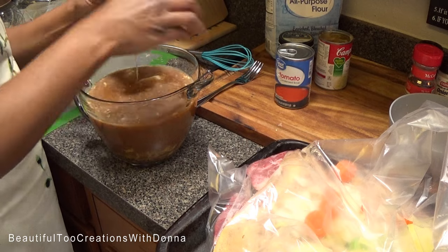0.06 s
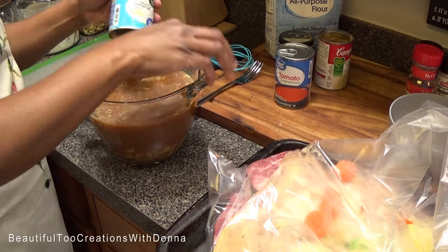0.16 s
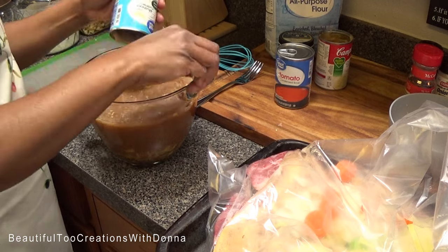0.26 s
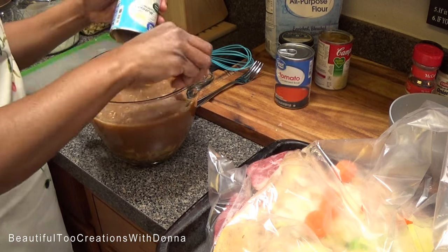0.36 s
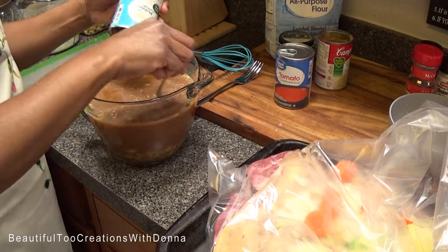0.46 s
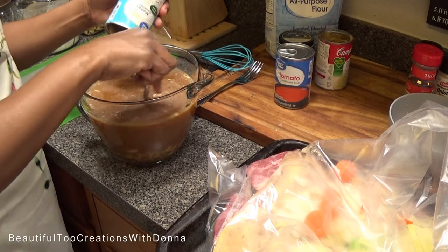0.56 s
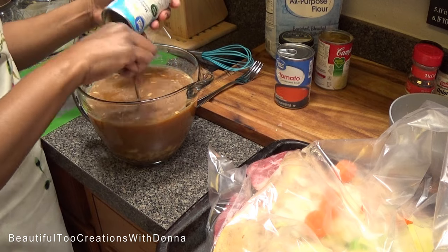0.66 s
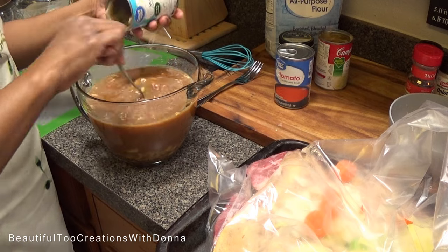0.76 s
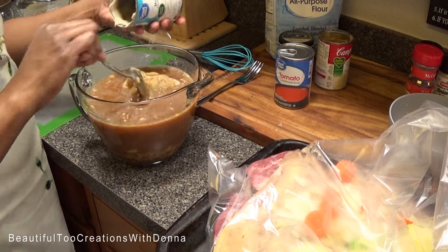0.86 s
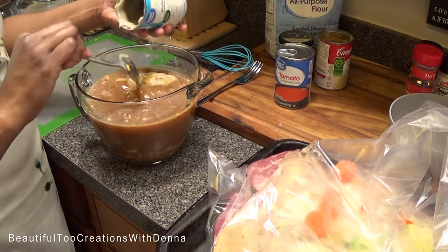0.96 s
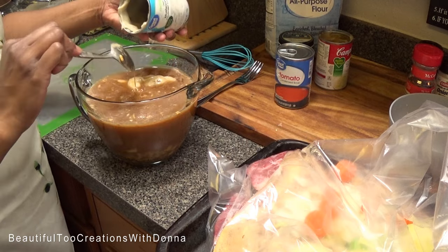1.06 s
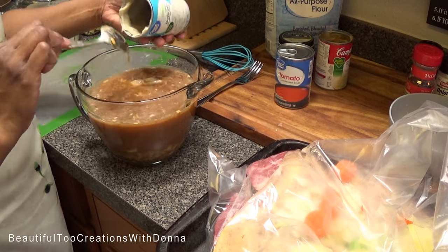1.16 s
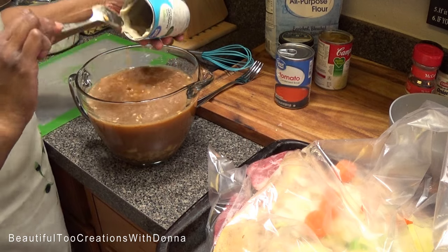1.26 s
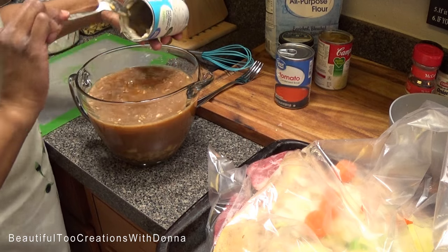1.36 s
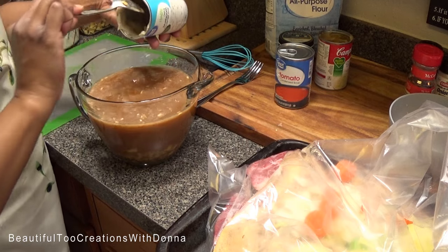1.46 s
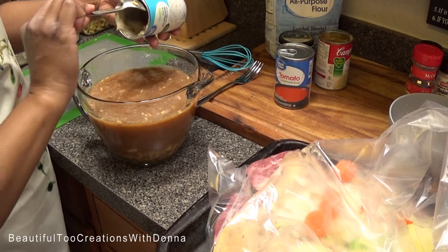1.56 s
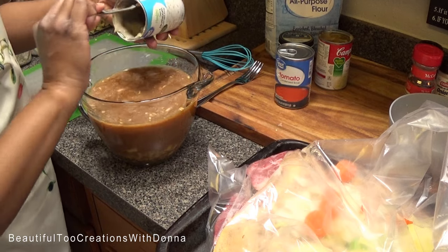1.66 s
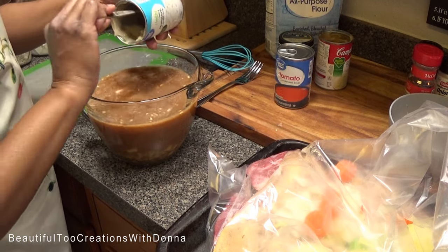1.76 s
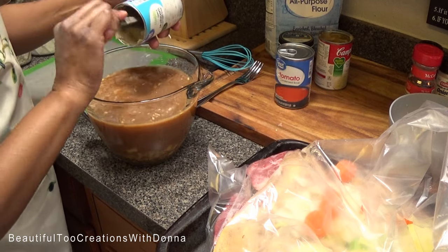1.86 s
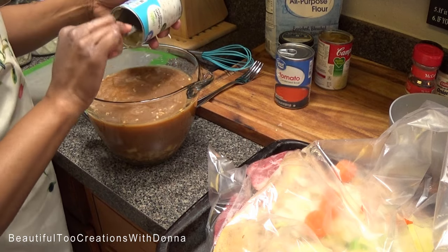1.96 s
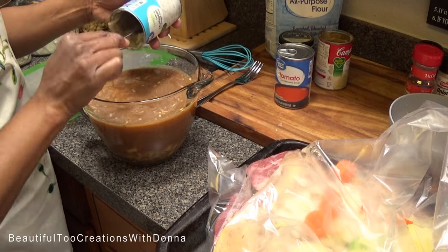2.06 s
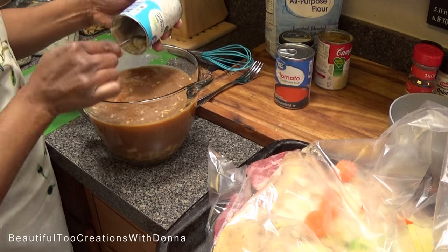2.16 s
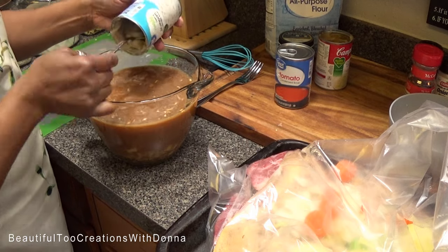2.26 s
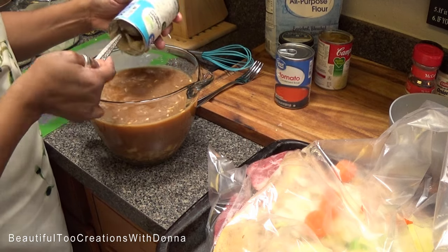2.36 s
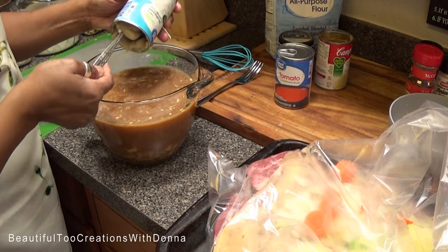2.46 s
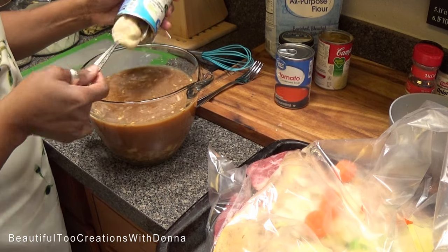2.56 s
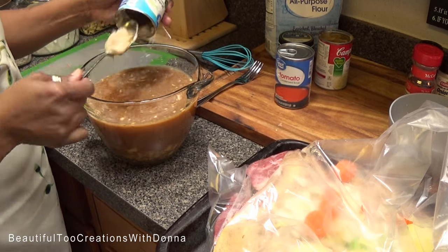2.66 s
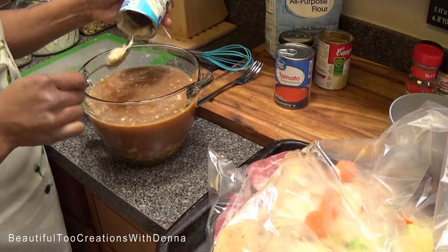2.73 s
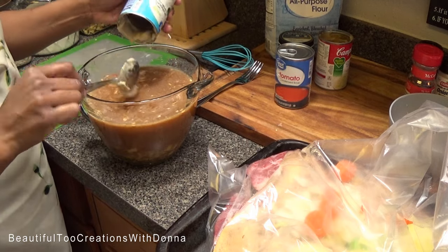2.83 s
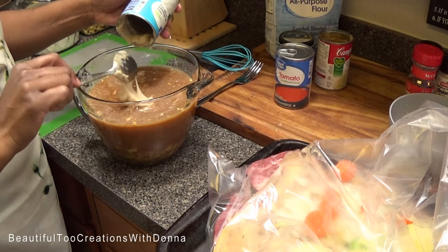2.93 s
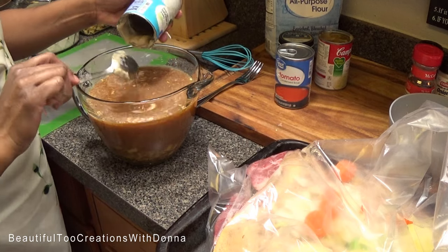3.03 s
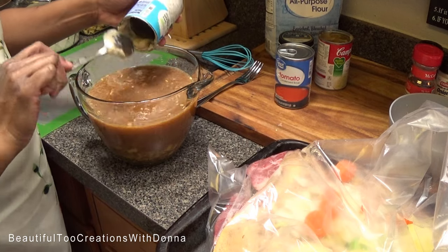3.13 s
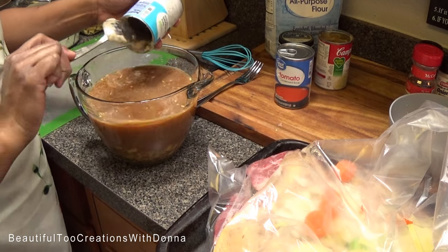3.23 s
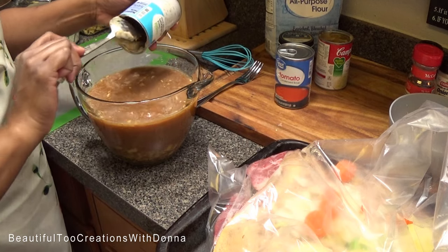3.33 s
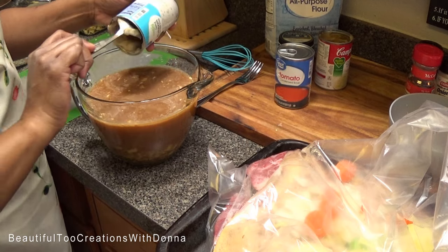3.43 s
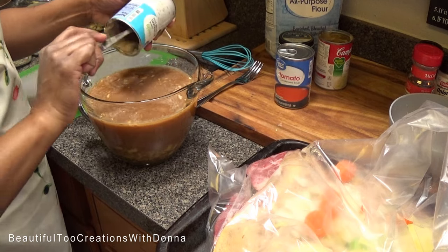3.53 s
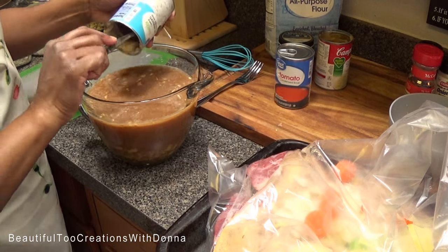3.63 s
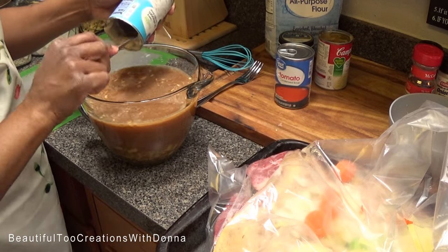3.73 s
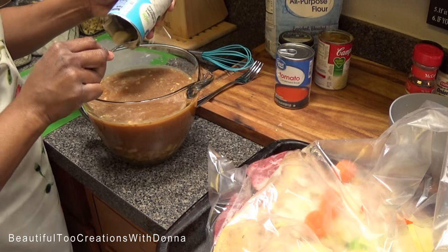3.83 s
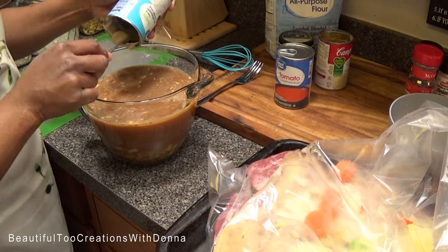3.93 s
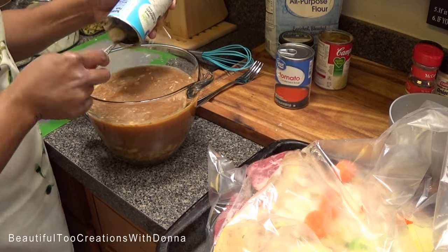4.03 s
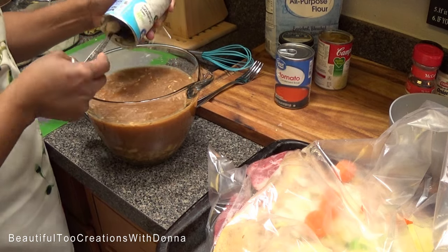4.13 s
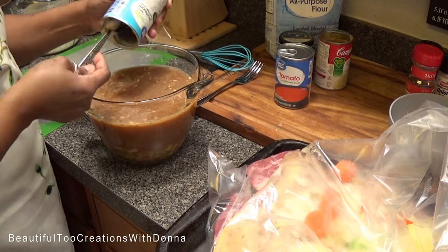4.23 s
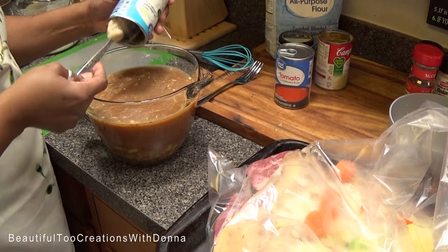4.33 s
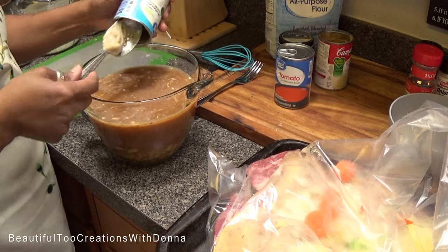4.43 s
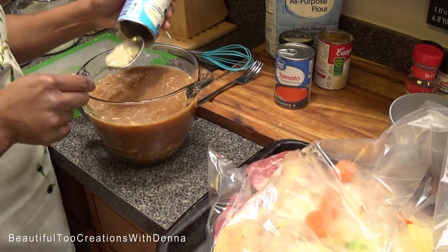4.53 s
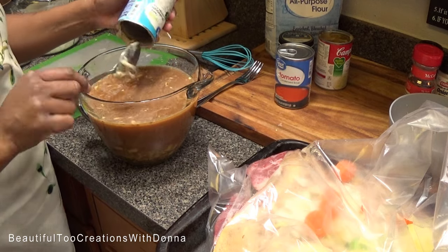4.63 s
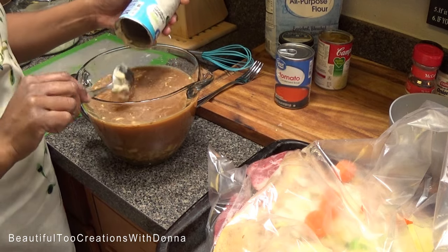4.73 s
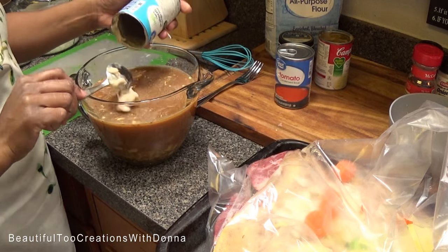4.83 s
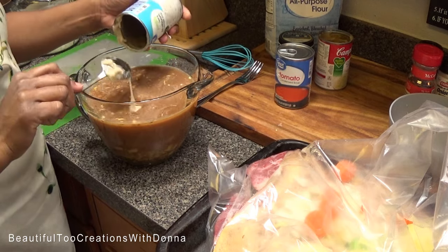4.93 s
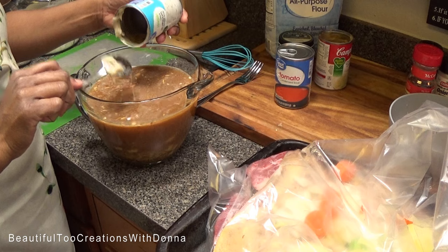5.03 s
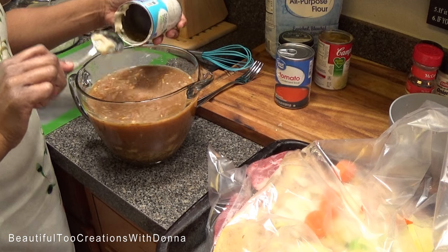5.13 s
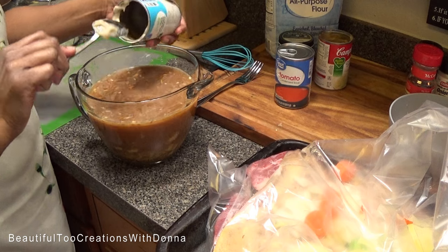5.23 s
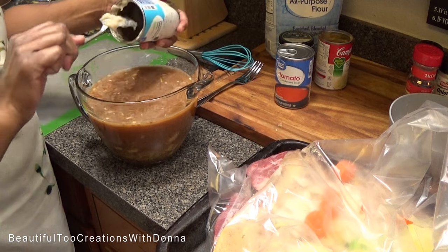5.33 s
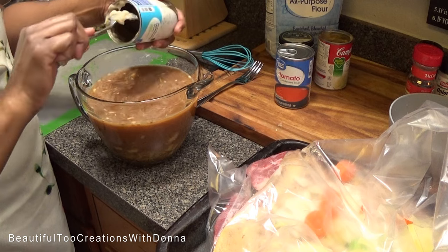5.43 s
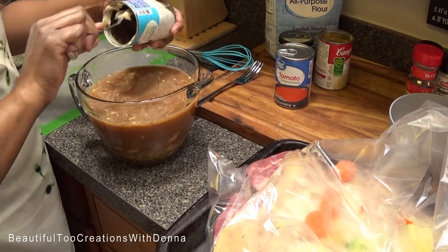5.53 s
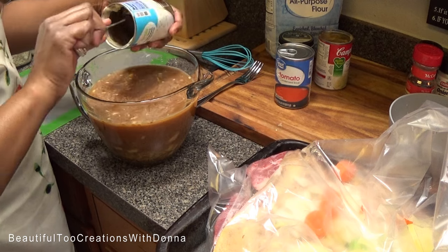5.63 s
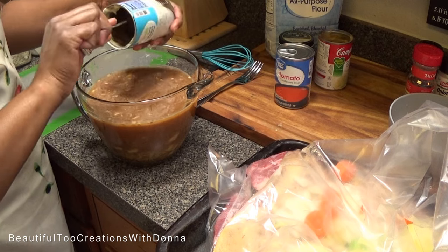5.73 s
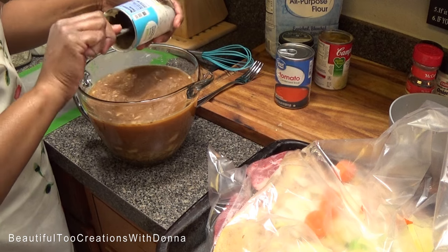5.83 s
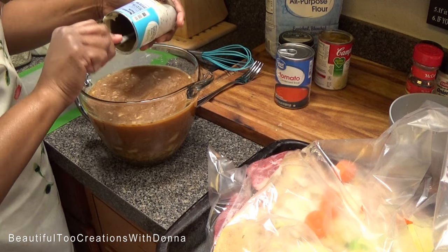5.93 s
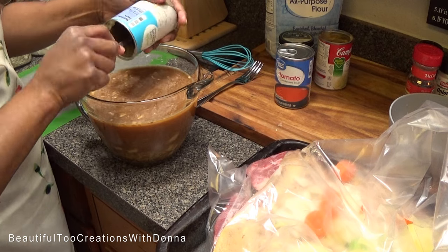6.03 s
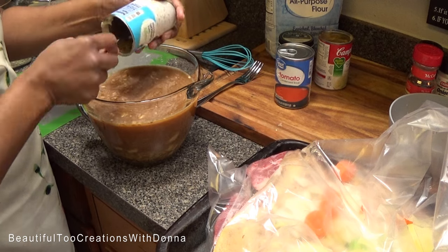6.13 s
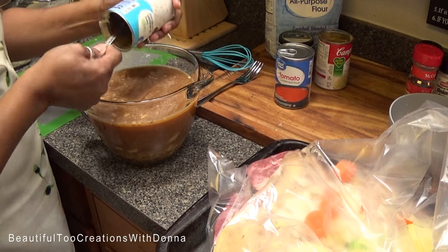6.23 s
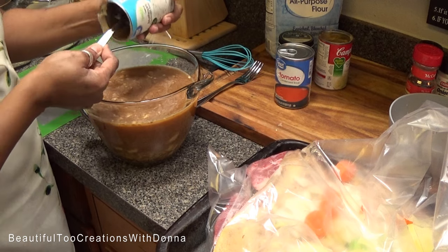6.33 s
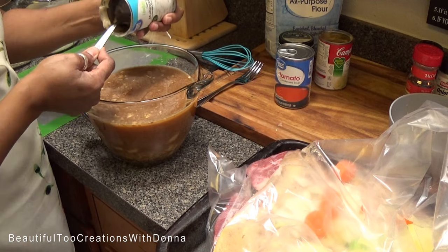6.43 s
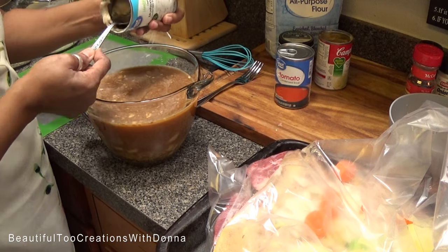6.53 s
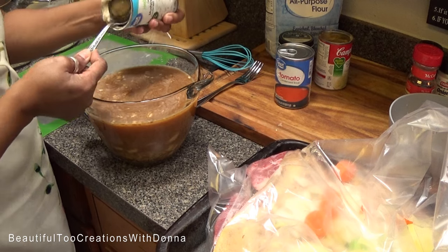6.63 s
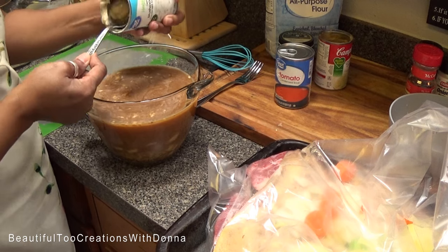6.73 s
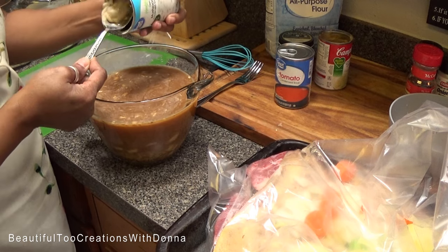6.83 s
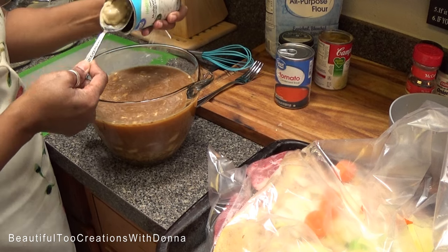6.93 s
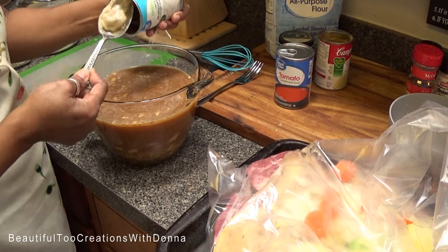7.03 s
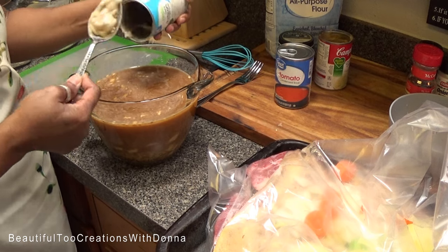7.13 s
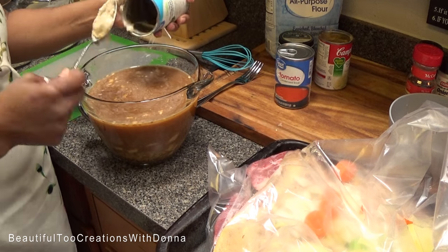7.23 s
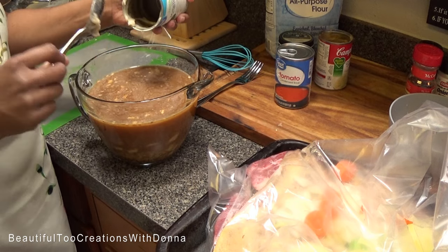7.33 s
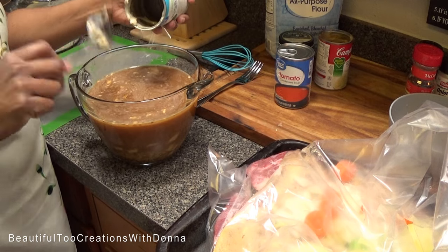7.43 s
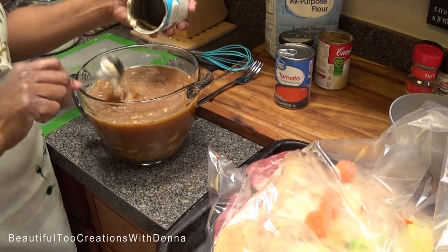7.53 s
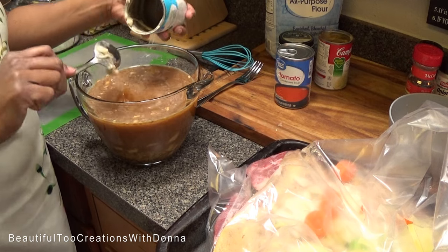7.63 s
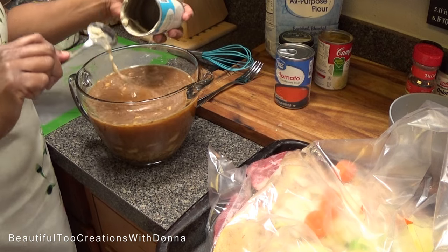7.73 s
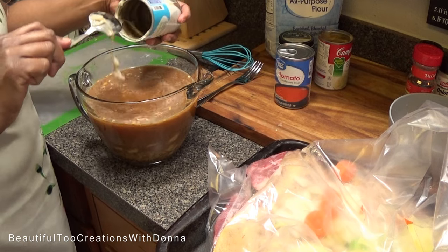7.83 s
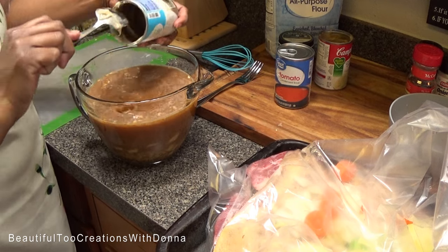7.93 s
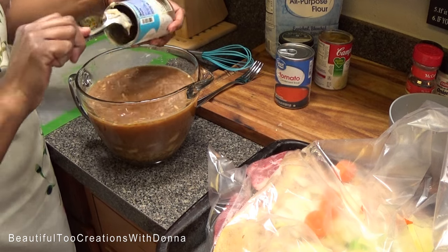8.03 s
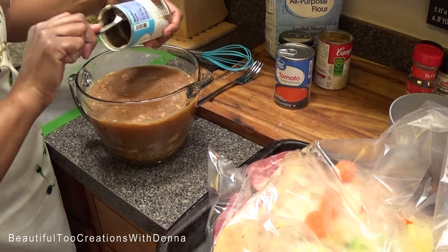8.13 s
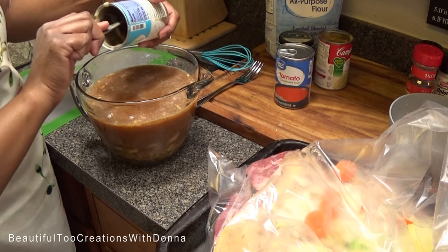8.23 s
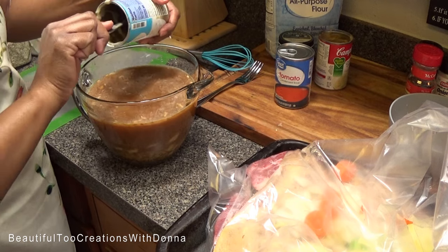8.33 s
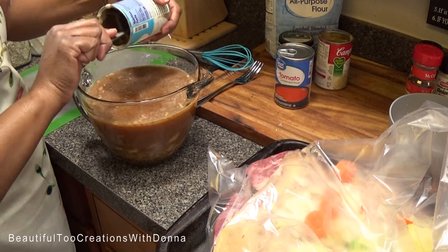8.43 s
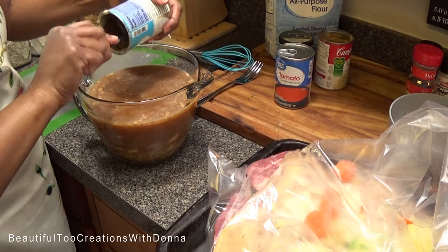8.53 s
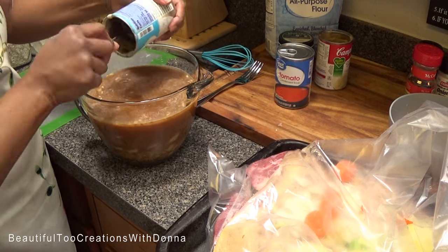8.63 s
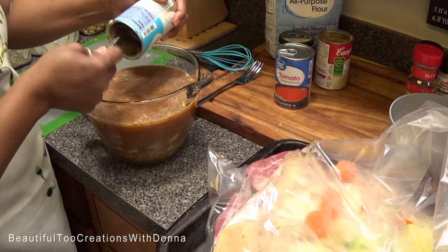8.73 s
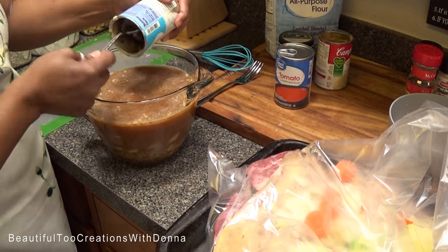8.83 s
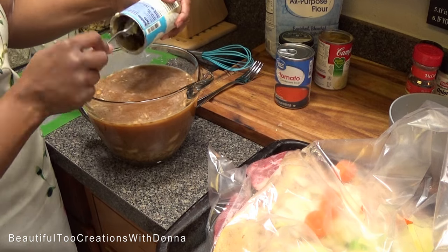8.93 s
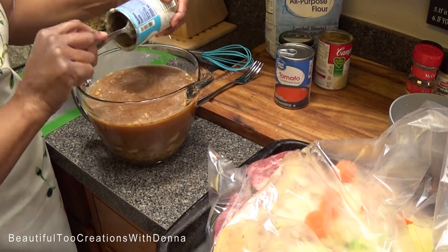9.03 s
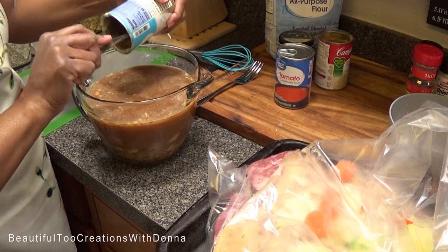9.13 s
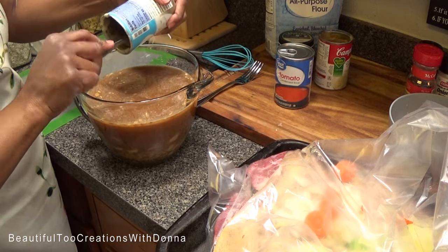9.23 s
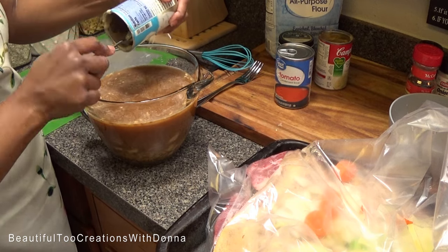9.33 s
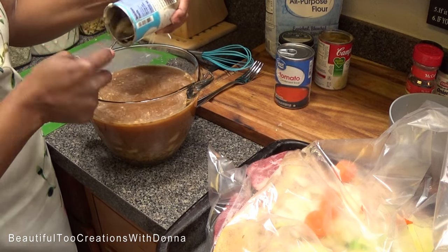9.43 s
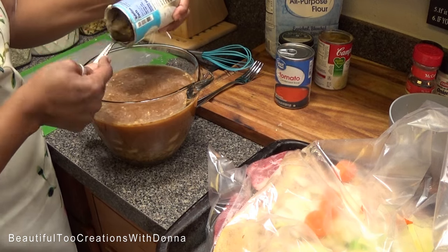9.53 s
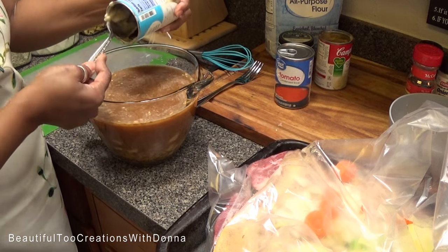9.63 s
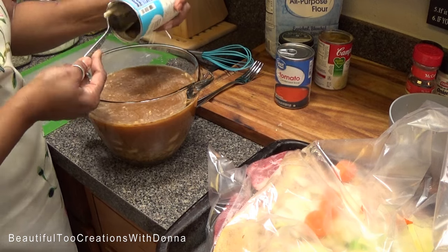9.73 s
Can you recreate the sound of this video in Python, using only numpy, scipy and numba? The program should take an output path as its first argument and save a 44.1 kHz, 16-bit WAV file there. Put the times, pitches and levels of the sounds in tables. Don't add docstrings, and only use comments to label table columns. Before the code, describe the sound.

A metal spoon scrapes and knocks inside a small tin can of thick soup, sparse at first, then busier and louder, in a quiet kitchen.

```python
import sys
import numpy as np
from scipy import signal
from scipy.fft import rfft, irfft, next_fast_len
from scipy.io import wavfile
from scipy.ndimage import uniform_filter1d
from numba import njit

SR = 44100
rng = np.random.default_rng(int(sys.argv[2]) if len(sys.argv) > 2 else 0)


def pcm_store(signal):
    levels = np.round(np.clip(np.atleast_2d(signal), -1, 1) * 32767)
    wavfile.write(sys.argv[1], SR, levels.astype(np.int16).T)


def attenuation_scalar(level_db):
    decades = np.asarray(level_db, float) / 20
    return 10 ** decades


N = 431281
TIME = np.arange(N) / SR

# (frequency [Hz], density [dB per Hz])
HUM_SPECTRUM = [(24, -57), (40, -49), (237, -14.5), (467, -12), (1520, -10.5), (2910, -13), (6020, -17),
                (16000, -27)]
# (frequency [Hz], likeness [0-1])
HUM_LIKENESS = [(60, 0.9), (130, 0.7), (290, 0.74), (640, 0.34), (1410, 0.04), (3100, 0.47), (6820, 0.8),
                (15000, 0.98)]
# (frequency [Hz], width [Hz], level [dB])
WHINES = [(5850, 60, -74), (7850, 80, -76), (120, 16, -90), (60, 70, -89)]
# (time [s], level [dB])
STIR = [(0, -60), (2.1, -61.5), (2.3, -55.5), (2.6, -60), (4.8, -58), (5.4, -57.5), (5.6, -61), (9.78, -56)]
STIR_LOW_DB, NUDGE_DB, NUDGE_S = -12, 6.5, 0.4
# (time [s], centre [Hz], length [s], level [dB])
BUMP = (2.3, 75, .08, -62)

# (time [s], level [dB])
MOTOR_LEVEL = [(1.3, -48.5), (3, -47), (7, -48), (9.7, -45.5)]
FRAME_HZ, FIRST_STEP_S = 30000 / 1001, .0265

# (time [s], peak [dB], pitch [Hz], width
TICKS = [(0.9637, -36.5, 1890, 0.86), (1.2274, -36.5, 8900, 0.16), (1.319, -36, 2770, 0.37),
         (1.4331, -28, 5160, 0.16), (3.1607, -40, 1630, 0.058), (3.221, -32.5, 5600, 0.084),
         (4.0163, -39, 9300, 0.33), (5.4266, -42, 2920, 0.48), (7.656, -29.5, 8000, 0.49),
         (7.6937, -22.5, 5840, 1.1), (8.998, -17, 3500, .8), (9.1133, -28, 3800, 0.82),
         (9.147, -28, 4600, 0.33), (8.727, -25, 3190, .6), (8.878, -30, 3000, 1), (9.703, -23, 3300, .9),
         (4.184, -38, 5800, 0.14), (9.1891, -35, 3630, .2), (8.293, -38, 7500, .3), (6.685, -38, 3800, .3),
         (9.367, -28.5, 4000, 0.51), (9.597, -28, 4500, .5)]

# (pitch [Hz], level [dB], t60 [s])
LOADED_MODES = [(857, 0.5, 0.15), (1055, -10, 0.039), (1138.6, 0.5, 0.12), (2023, -4.5, 0.24),
                (2175, 0, 0.093), (2840, 0.5, 0.11), (3220, -5, 0.09), (3510, -28, 0.76),
                (3900, -4.5, 0.057), (4380, 0, 0.035), (4840, 4.5, 0.0064), (4900, -6.5, 0.048),
                (5350, 1.5, 0.023), (6040, -1.5, 0.019)]
# (pitch [Hz], level [dB], t60 [s])
EMPTY_MODES = [(863.8, 3, 0.19), (980, -2, 0.014), (1240, 2.5, 0.056), (1880, -7, 0.12),
               (2180, -1.5, 0.075), (2375, -5.5, 0.086), (3040, -7.5, 0.1), (3300, -14, 0.27),
               (4100, -1, 0.037), (4700, 1.5, 0.017), (5114, 3.5, 0.016), (5720, 0.5, 0.014),
               (6010, -4, 0.016), (6530, -2, 0.055)]
EMPTIED_S = 5.5
EDGES_HZ = [350, 1500, 4000, 8000, 16000]
# (low [Hz], high [Hz])
RASP_HZ = [(400, 810), (1900, 4090), (4000, 7640), (7000, 9100)]
# (unresonant rasp [dB], blow gain [dB], crack [dB])
BAND_LEVELS = [(-46, -11.5, -17.5), (-5, -12.5, -4.5), (-3.5, -5.5, 0.5), (-15, -30, -68.5)]
# (time [s], pitch [Hz])
HOLLOW_PITCH = [(0.0, 693), (0.35, 760), (0.65, 735), (1.28, 840), (2.04, 793), (2.56, 667), (3.27, 691),
                (4.74, 691), (5.36, 833), (5.55, 689.4), (6.32, 767), (6.78, 612), (8.01, 818), (8.55, 753),
                (9.04, 775), (9.45, 666), (9.78, 667)]
BODY_LOW_HZ = 404

# (time [s], hold [s], wall [dB], hollow [dB re wall], rim [dB re wall])
DRAGS = [(0.0, 0.086, -54, -3, 1.5), (.28, 0.013, -50.5, -2, -3.5), (1.56, 0.029, -27, -4, 0),
         (1.94, 0.071, -29.5, -21, -13), (2.64, 0.037, -31.5, -3, 0), (3.47, 0.017, -27, -4.5, -5),
         (3.857, 0.036, -46.5, 5.5, -6), (4.448, 0.022, -28.5, -3, -3), (5.768, 0.073, -39, -2.5, -8),
         (6.015, 0.018, -29.5, -25, -4), (6.17, 0.084, -41.5, 5.5, -6), (7.225, 0.018, -27.5, -6.5, -9),
         (7.652, 0.096, -55, -10, 2.5), (8.068, 0.048, -24.5, -25, 5.5), (8.39, 0.011, -42.5, -8, 6.5),
         (8.54, 0.013, -16.5, -27, -7.5), (8.128, 0.038, -30, -27, 5), (9.57, 0.18, -37, -1, -12.5)]
# (time [s], hold [s], wall [dB], hollow [dB re wall], rim [dB re wall])
PUSHES = [
    (4.25, 0.072, -47.5, 7.5, -5),
    (4.42, 0.024, -44.5, -0.5, -8),
    (5.985, 0.012, -33.5, -12, -16),
    (6.135, 0.013, -36, -10.5, -3.5),
    (7.15, 0.058, -24, -22, -14.5),
    (8.5, 0.045, -23.5, -41, -14),
    (8.74, 0.05, -34.5, -20, -3.5),
    (9.02, 0.025, -31.5, -3, -26),
]
# (time [s], hold [s], wall [dB], hollow [dB re wall], rim [dB re wall])
RUBS = [(1.87, 0.084, -55.5, 3, -11), (2.15, .44, -54, 3.5, -10), (3.65, 0.22, -55.5, 0.5, -8),
        (4.6, 0.14, -60, -6, -5), (6.25, 0.48, -41.5, -7, -13), (7.02, 0.029, -47, 8.5, -8),
        (7.36, 0.085, -48.5, -10, -21), (8.25, 0.16, -51.5, 0, -0.5), (8.62, 0.039, -32, -7.5, -10),
        (8.83, 0.053, -42, -4.5, -5.5), (9.07, 0.084, -37, -8, -12), (9.22, 0.045, -64, 8, -32)]
# (time [s], hold [s], wall [dB], hollow [dB re wall], rim [dB re wall])
SLIDES = [(3.53, 0.025, -34, -1.5, 3.5), (3.56, .028, -35, 1, -0.5), (5.9, .04, -35.5, -11, -8),
          (6.575, 0.043, -41, 0.5, -5), (2.61, 0.022, -38.5, -1, -5), (6.89, 0.01, -26.5, -9, -13),
          (6.93, 0.042, -28.5, -20, -9.5), (7.085, 0.03, -26.5, -2.5, -16), (9.365, 0.011, -39, 4.5, -16),
          (9.545, 0.016, -43, 8.5, -10), (4.488, .012, -34, -7.5, 0.5), (9.59, 0.021, -36, 1.5, -5.5)]

# (time [s], wall peak [dB], hollow [dB re wall], rim [dB re wall], wall note [Hz])
KNOCKS = [(1.5386, -7, -7.5, -7.5, 2890), (1.924, -14, -15.5, -8.5, 2606), (2.6411, -25, 7, -11, 2840),
          (3.461, -15.5, 2.5, -6, 3900), (4.4455, -21, 4, -25, 2460), (5.8357, -8.5, -25, -41, 2098),
          (6.0006, -5, -17.5, -13, 3100), (6.1528, -4, -5.5, -14, 3000), (7.2108, -4.5, -16, -12.5, 3340),
          (7.655, -20, -35, -25, 3140), (8.064, -11.5, -9, -10, 3040), (8.1385, -23.5, -30, 5.5, 2230),
          (8.3752, -2, -28, -11, 2410), (8.524, -5, -18, -6.5, 2387), (8.629, -19, 0, -1, 3230),
          (8.741, -25.5, -10, -5, 4200), (9.0295, -18, 2, 0, 3430), (9.5871, -25.5, 3.5, -7.5, 2750),
          (9.7106, -23.5, 3, -16.5, 3090)]
# (time [s], wall peak [dB], hollow [dB re wall], rim [dB re wall], wall note [Hz])
TAPS = [(1.794, -43, -17, -22, 1950), (1.8657, -43.5, 5.5, 5.5, 2920), (2.0667, -30.5, -9, -14, 2230),
        (3.7045, -46, 6, -3, 1700), (3.8544, -40.5, -3, -23, 3120), (5.7651, -41.5, 6.5, -7, 2546),
        (6.4505, -24, -9, -3, 3900), (5.8425, -14.5, -11, -34, 1975), (6.7027, -36.5, 1, -3.5, 3006),
        (6.7246, -36.5, 10, -7.5, 2840), (8.3264, -42.5, 2, -2, 2930), (8.9486, -40.5, 3.5, 6, 2610),
        (8.9918, -23, -9, -0.5, 2360), (9.0144, -28, -15, 1, 2500), (9.113, -36.5, 7, -5, 3000),
        (9.23, -33, -26, -6.5, 3030), (9.3545, -34.5, 0, -7.5, 1800), (9.6604, -33.5, -5, -5, 3100)]
REBOUND_S, REBOUND_DB = .005, -8
RIM_NOTE_HZ, RIM_FOLLOWS = 4900, 0.37

# (start [s], length [s], pitch [Hz], level [dB], t60 [s])
RINGS = [(.25, 0.028, 1190, -54, 0.23), (1.532, 0.059, 2900, -25.5, 0.15), (1.99, 0.11, 1240, -44, 0.086),
         (2.02, 0.064, 2100, -44.5, 0.39), (3.46, 0.022, 1180, -27.5, 0.34), (3.57, 0.032, 2070, -42, 0.3),
         (5.837, 0.045, 2035, -28.5, 0.11), (5.837, 0.017, 3830, -35, 0.094), (6.0, 0.042, 1270, -28, 0.2),
         (6.169, 0.071, 2090, -34.5, 0.3), (7.212, 0.064, 2190, -33.5, 0.18),
         (8.065, 0.024, 1260, -30, 0.19), (8.08, 0.082, 2170, -31, 0.36), (8.09, 0.12, 2230, -34, 0.21),
         (8.369, 0.016, 1790, -26, 0.1), (8.525, 0.033, 1310, -23, 0.2), (8.568, .025, 1320, -26.5, 0.27),
         (8.742, 0.043, 4080, -32.5, 0.15), (7.212, .03, 1250, -35, .16), (4.2, .13, 1200, -50.5, .1),
         (4.21, 0.11, 2905, -51, .08), (1.93, .04, 1480, -43, .05), (5.87, .07, 2080, -36, 0.088),
         (8.378, 0.052, 2382, -30, 0.14), (9.04, .03, 2203, -35.5, 0.082),
         (0.748, 0.15, 1520, -56.5, .0054), (4.477, 0.028, 5800, -36.5, 0.0027)]
# (start [s], length [s], pitch [Hz], level [dB])
HUSHED = [(1.997, 0.018, 3040, -24), (5.984, 0.078, 6600, -44), (6.152, 0.039, 6400, -36),
          (6.308, 0.082, 4300, -47), (6.304, 0.084, 1870, -47), (6.339, 0.052, 3190, -39),
          (6.948, 0.044, 4850, -34), (7.085, 0.0294, 6000, -39), (1.54, 0.012, 3750, -19.5),
          (1.575, 0.029, 3800, -29), (3.46, 0.021, 4100, -32), (3.565, 0.03, 5100, -35.5),
          (3.57, 0.029, 4300, -38), (8.075, 0.046, 5700, -26), (8.09, .025, 4950, -30),
          (8.125, 0.046, 4950, -25.5), (8.151, 0.019, 5500, -28), (8.124, .025, 5200, -27),
          (8.172, .008, 5300, -26), (8.525, .035, 3300, -23.5), (8.376, 0.032, 4000, -30),
          (8.376, 0.027, 4000, -33), (5.978, .02, 3300, -34), (8.755, .06, 6450, -39),
          (4.45, .03, 2800, -34), (4.485, .025, 4600, -37), (4.385, .04, 4700, -51),
          (9.583, 0.033, 4900, -41), (6.9, .05, 3250, -43), (7.692, .012, 3400, -36),
          (1.926, .016, 2650, -25.5), (6.165, 0.094, 3000, -39.5), (6.2, .1, 5000, -46),
          (7.085, .05, 2170, -36), (7.09, .1, 3050, -37), (7.08, .1, 1750, -40), (8.47, .035, 1900, -32),
          (8.495, .02, 5500, -36), (6.0, .012, 3150, -14), (6.155, .015, 4100, -24), (8.63, .03, 6800, -30),
          (6.33, .07, 5000, -44), (1.87, 0.052, 1450, -50), (2.64, 0.051, 2800, -38.5),
          (7.17, .04, 3950, -34), (6.56, .09, 3050, -45.5), (6.89, 0.099, 3050, -37),
          (8.565, 0.029, 5100, -34), (8.07, .04, 3700, -30), (8.728, 0.083, 6800, -39)]
# (start [s], length [s], start [Hz], end [Hz], level [dB])
SQUEAKS = [(1.568, .047, 4900, 4460, -34), (1.956, 0.038, 2630, 2630, -26), (1.974, 0.037, 7600, 7400, -43),
           (5.897, 0.052, 2560, 3110, -28), (6.02, 0.12, 3300, 3140, -40.5), (6.16, 0.12, 4220, 3960, -41),
           (6.918, 0.065, 2860, 2250, -27.5), (7.13, 0.06, 3930, 4100, -60), (8.376, 0.06, 2600, 2570, -28),
           (8.465, 0.049, 1860, 3060, -28.5), (8.488, 0.022, 3700, 3300, -24.5),
           (8.53, 0.11, 2375, 2540, -32)]
# (start [s], length [s], start [Hz], end [Hz], level [dB])
MOANS = [
    (6.45, 0.11, 725, 690, -47),
    (6.57, 0.21, 710, 620, -42),
    (6.865, 0.12, 630, 660, -39.5),
    (7.0, .08, 680, 650, -41),
    (7.081, 0.05, 680, 770, -39),
    (6.77, 0.1, 617, 612, -50),
    (9.1, .1, 730, 620, -43),
    (2.21, 0.096, 790, 770, -49),
    (2.37, 0.076, 790, 820, -52),
]
HUSHED_T60_S, SQUEAK_T60_S, MOAN_T60_S = 0.038, 0.028, 0.089
SAG = 0.995
STRUCK_DB = 29

# (frequency [Hz], lead [rad])
LEAD = [(60, -0.066), (250, -0.36), (600, -0.88), (1200, -0.69), (2500, -0.62), (5000, -0.25),
        (9000, -0.34), (15000, 0.0084)]
# (frequency [Hz], left minus right [dB])
TILT = [(300, -0.5), (700, -0.5), (2500, -1.5), (8000, 0)]
ROOM_T60_S, ROOM_DB, ROOM_HZ = 0.34, -11, 4350
MIC_LOW_HZ = 34


def unit(x):
    return x / np.sqrt(np.mean(x ** 2))


def over_hz(table, hz):
    f, v = np.transpose(table)
    return np.interp(np.log(hz + 1), np.log(f), v)


def over_time(table, s):
    return np.interp(s, *np.transpose(table))


def band(x, lo_hz, hi_hz):
    return signal.sosfilt(signal.butter(2, [lo_hz, min(hi_hz, .45 * SR)], "band", fs=SR, output="sos"), x)


def walk(rate):
    return np.interp(TIME * rate, np.arange(400), rng.standard_normal(400))


@njit
def ring(x, hz, keep):
    out, z = np.empty(len(x)), 0j
    for i in range(len(x)):
        if i % 16 == 0:
            p = keep * np.exp(2j * np.pi * hz[i] / SR)
        z = z * p + x[i]
        out[i] = z.imag
    return out * np.sqrt(2 * (1 - keep ** 2))


def kept(t60):
    return np.exp(-np.log(1000) / (max(t60, .002) * SR))


def add(track, s, piece):
    i = int(s * SR)
    track[i:i + len(piece)] += piece[:N - i]


def hum():
    hz = np.fft.rfftfreq(N, 1 / SR)
    like = np.clip(over_hz(HUM_LIKENESS, hz), 0, .99)
    air = rfft(rng.standard_normal((2, N))) * attenuation_scalar(over_hz(HUM_SPECTRUM, hz))
    mid, side = air * np.sqrt([1 + like, 1 - like])
    high_db = over_time(STIR, TIME)
    low_db = high_db + STIR_LOW_DB + NUDGE_DB * np.exp(-((TIME - BUMP[0]) / NUDGE_S) ** 2)
    out = np.zeros(N)
    for f, width, db in WHINES:
        out += attenuation_scalar(db) * unit(band(rng.standard_normal(N), f - width / 2, f + width / 2))
    for part, db in ((hz < 450, low_db), (hz >= 450, high_db + 4)):
        out = out + unit(irfft([(mid + side) * part, (mid - side) * part], N)) * attenuation_scalar(db)
    return out


def bump():
    s, hz, length, db = BUMP
    thud = unit(band(rng.standard_normal(N), hz / 2, hz * 2))
    return attenuation_scalar(db) * thud * np.exp(-((TIME - s) / length) ** 2)


def lens_motor():
    out, t = np.zeros(N), TIME[:500]
    pip = np.sin(2 * np.pi * 2875 * t) * np.exp(-((t - .0045) / 0.0037) ** 2)
    steps = np.arange(39, 292)
    for k, noise in zip(steps, rng.standard_normal((len(steps), len(t)))):
        s = FIRST_STEP_S + k / FRAME_HZ
        click = band(noise * np.exp(-((t - .002) / .0013) ** 2), 2200, 3900)
        click /= np.abs(click).max()
        step = attenuation_scalar(-7) * pip + attenuation_scalar(3) * click if k % 2 else pip + attenuation_scalar(-10) * click
        add(out, s, step * attenuation_scalar(over_time(MOTOR_LEVEL, s) + 1.0 * noise[0]))
    return out


def grip():
    rumble = unit(band(rng.standard_normal(N), 50, 440))
    return attenuation_scalar(-30) * rumble * uniform_filter1d(strokes()[0], size=400)


def ticks():
    out, t = np.zeros(N), TIME[:900]
    for (s, db, hz, share), noise in zip(TICKS, rng.standard_normal((len(TICKS), len(t)))):
        click = band(noise * np.exp(-t / 0.0027), hz / (1 + share), hz * (1 + share))
        add(out, s, attenuation_scalar(db) * click / np.abs(click).max())
    return out


def strokes():
    power = np.zeros((3, N))
    kinds = ((DRAGS, 3600, 252), (PUSHES, 133, 280), (RUBS, 89, 170), (SLIDES, 550, 217))
    for table, rise, fall in kinds:
        for s, hold, db, low_db, rim_db in table:
            near = slice(max(int((s - .5) * SR), 0), int((s + hold + .5) * SR))
            t = TIME[near] - s
            shape = attenuation_scalar(db - rise * np.maximum(-t, 0) - fall * np.maximum(t - hold, 0))
            power[:, near] += (attenuation_scalar(np.array([[low_db], [0], [rim_db]])) * shape) ** 2
    return np.sqrt(power)


def friction(per_s, spread_db, smooth):
    when = rng.random(N) < per_s / SR
    size = attenuation_scalar(spread_db * np.minimum(rng.exponential(size=N), 5.5))
    slips = when * size * rng.choice([-1, 1], N)
    return unit(unit(slips) + smooth * rng.standard_normal(N)) * attenuation_scalar(2.0 * walk(35))


def blows(chatter_s, note_t60):
    force, notes = np.zeros((4, N)), np.zeros(N)
    t = TIME[:4000]
    rebound = attenuation_scalar(REBOUND_DB) * np.exp(-((t - REBOUND_S) / 0.0014) ** 2)
    contact = 0.67 * np.exp(-t / 0.00082) + rebound + 0.35 * np.exp(-(t / chatter_s) ** 3)
    fade = (1 - np.exp(-t / 0.0013)) * np.exp(-(t / note_t60) ** 0.91 * np.log(1000))
    hits = KNOCKS + TAPS
    for (s, db, low_db, rim_db, hz), jolt in zip(hits, rng.standard_normal((len(hits), len(t)))):
        for track, rel_db in zip(force, (low_db, 0, rim_db, rim_db)):
            add(track, s, attenuation_scalar(db + rel_db) * jolt * contact)
        rim_hz = RIM_NOTE_HZ * (hz / 2800) ** RIM_FOLLOWS
        wall_note = attenuation_scalar(db - 0.5) * np.sin(2 * np.pi * hz * t)
        rim_note = attenuation_scalar(db + rim_db - 9.0) * np.sin(2 * np.pi * rim_hz * t)
        add(notes, s, fade * (wall_note + rim_note))
    return force, notes


def songs(rub):
    out, waver = np.zeros(N), uniform_filter1d(rng.standard_normal(N), size=200)
    patches = [(s, length, hz, SAG * hz, db, t60) for s, length, hz, db, t60 in RINGS]
    patches += [(*row, SQUEAK_T60_S) for row in SQUEAKS]
    patches += [(*row, MOAN_T60_S) for row in MOANS]
    patches += [(s, length, hz, SAG * hz, db, HUSHED_T60_S) for s, length, hz, db in HUSHED]
    for start, length, hz, end_hz, db, t60 in patches:
        knock = min((row[0] for row in KNOCKS), key=lambda s: abs(s - start))
        struck = abs(knock - start) < .012
        start = knock if struck else start
        end = start + length
        t = start + TIME[:int((length + t60) * SR)]
        t = t[t < TIME[-1]]
        at = (t * SR).astype(int)
        press = np.sin(np.pi * np.clip((t - start) / (end - start), 0, 1)) ** 0.23
        drive = press * rub[at]
        drive[0] += attenuation_scalar(STRUCK_DB) * struck
        note = np.interp(t, [start, end], [hz, end_hz])
        note = note * (1 + 0.057 * (t60 < .06) * np.roll(waver, int(hz))[at])
        neighbour = attenuation_scalar(-9) * ring(drive, .945 * note, kept(t60 / 2))
        add(out, start, attenuation_scalar(db) * (ring(drive, note, kept(t60)) + neighbour))
    return out


def can():
    hollow, wall, rim = strokes()
    rub = friction(3500, 2.5, .7)
    force, out = blows(0.012, 0.051)
    drag = [rub * press for press in (hollow, wall, rim, rim)]
    bodies = ((LOADED_MODES, TIME < EMPTIED_S), (EMPTY_MODES, TIME >= EMPTIED_S))
    for k, (rasp_db, blow_db, crack_db) in enumerate(BAND_LEVELS):
        lo_hz, hi_hz = EDGES_HZ[k:k + 2]
        patchy = attenuation_scalar(rasp_db - 3 + 3.5 * walk(30))
        rasp = band(drag[k] * patchy + force[k] * attenuation_scalar(crack_db), *RASP_HZ[k])
        out += rasp * np.sqrt(SR / 2 / (hi_hz - lo_hz))
        for body, when in bodies:
            for hz, db, t60 in body:
                if lo_hz <= hz < hi_hz:
                    reach_db = 3.5 * walk(8)
                    blow = force[k] * attenuation_scalar(blow_db + 11.0 + 0.07 * reach_db)
                    drive = (drag[k] * attenuation_scalar(reach_db) + blow) * when * attenuation_scalar(db - 13.0)
                    out += ring(drive, hz * (1 + 0.019 * walk(3.5)), kept(t60))
    air = ring(drag[0] + attenuation_scalar(1) * force[0], over_time(HOLLOW_PITCH, TIME), kept(0.039))
    return out + attenuation_scalar(0.5) * band(air, 617, 2200) + songs(rub)


def kitchen(x):
    size = next_fast_len(N + SR)
    hz = np.fft.rfftfreq(size, 1 / SR)
    half = attenuation_scalar(over_hz(TILT, hz) / 2) * np.exp(.5j * over_hz(LEAD, hz))
    direct = np.array([half, 1 / half])
    t = TIME[:SR]
    tail = rng.standard_normal((2, SR)) * kept(ROOM_T60_S) ** (t * SR) * (1 - np.exp(-(t / 0.00056) ** 2))
    tail = rfft(tail / np.sqrt(np.sum(tail ** 2) / 2), size)
    tail = tail / (1 + 1j * hz / ROOM_HZ) / (1 + 1j * hz / 9000)
    return irfft(rfft(x, size) * (direct + attenuation_scalar(ROOM_DB) * tail), size)[:, :N]


def scene():
    thin = signal.sosfilt(signal.butter(2, BODY_LOW_HZ, "high", fs=SR, output="sos"), can())
    return kitchen(thin + ticks()) + lens_motor() + bump() + grip() + hum()


def top_cut(x):
    return signal.sosfilt(signal.butter(12, 16470, fs=SR, output="sos"), x)


def record(dry):
    thin = signal.sosfilt(signal.butter(1, MIC_LOW_HZ, "high", fs=SR, output="sos"), dry)
    thin = thin + attenuation_scalar(-31) * (thin ** 2 - np.mean(thin ** 2))
    mix = np.tanh(0.9 * thin) / 0.91
    return top_cut(mix)


dry = scene()
out = record(dry)
pcm_store(out)
```